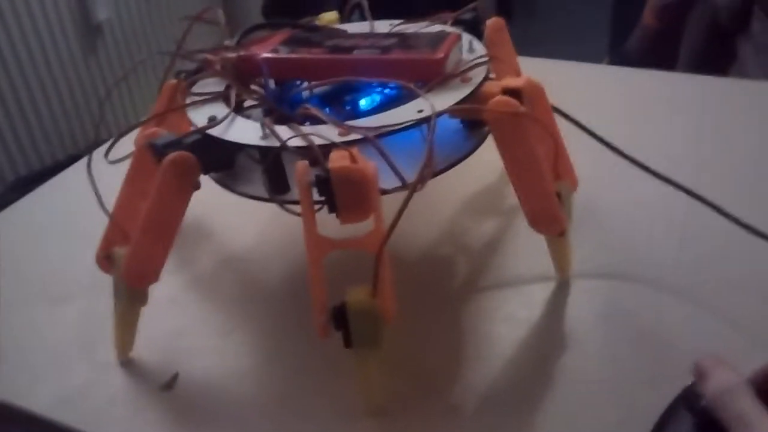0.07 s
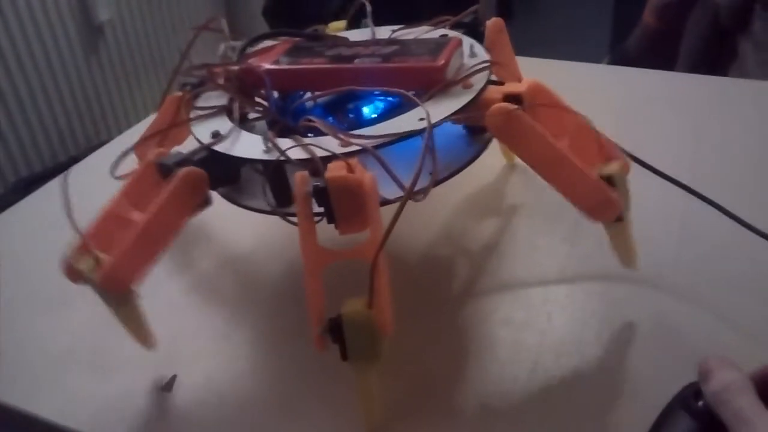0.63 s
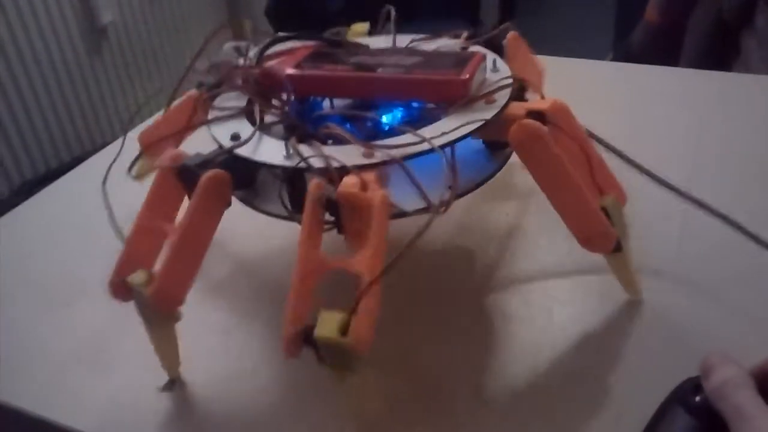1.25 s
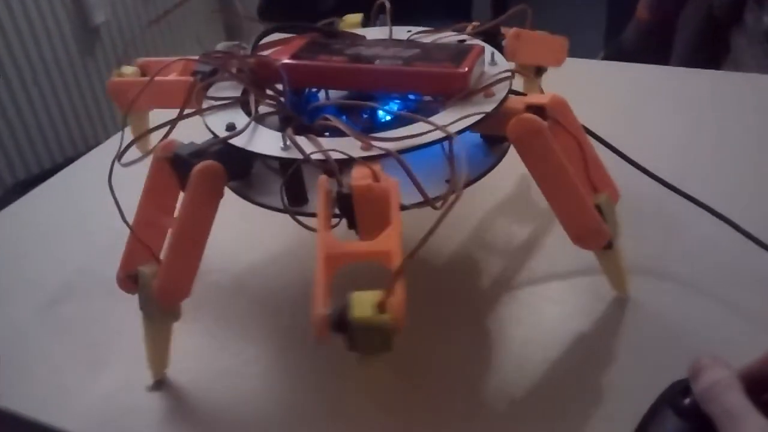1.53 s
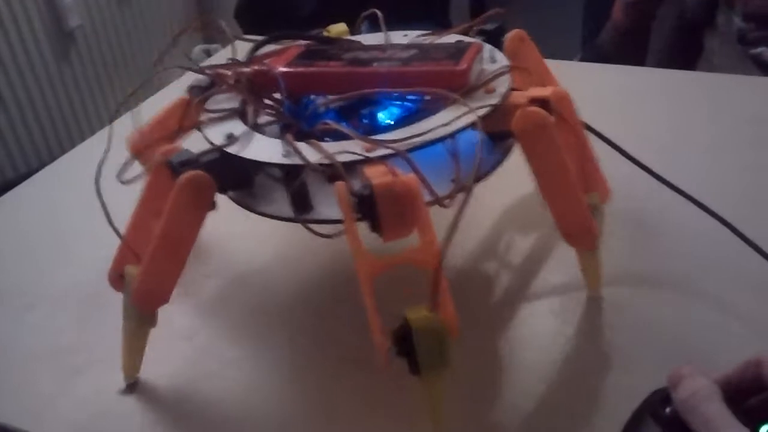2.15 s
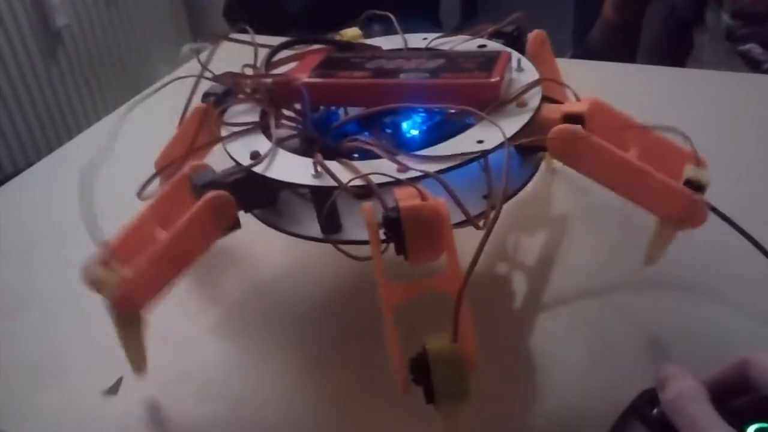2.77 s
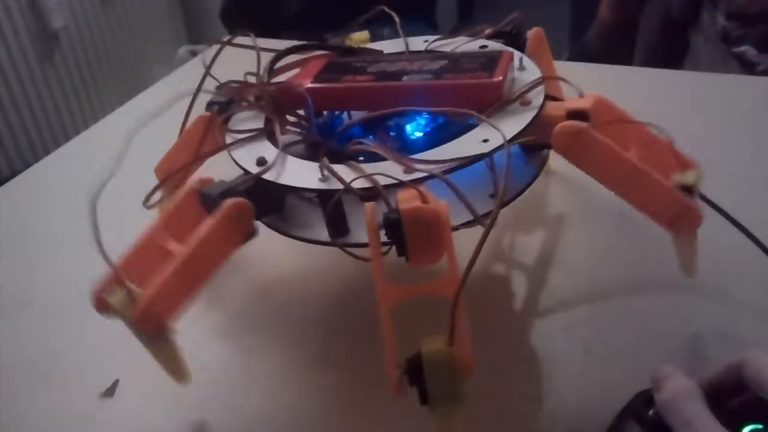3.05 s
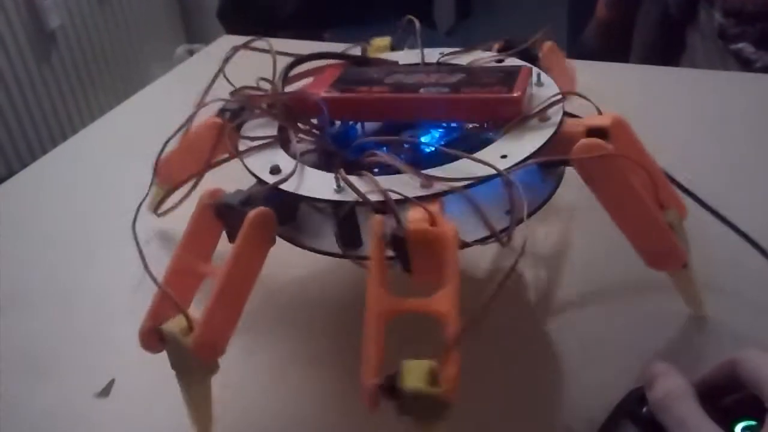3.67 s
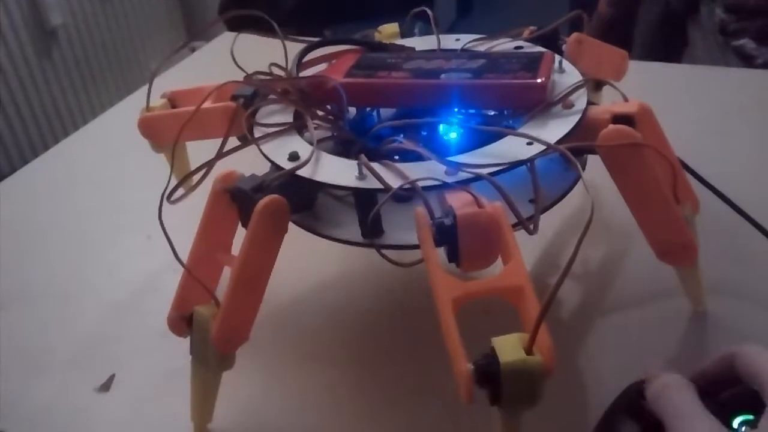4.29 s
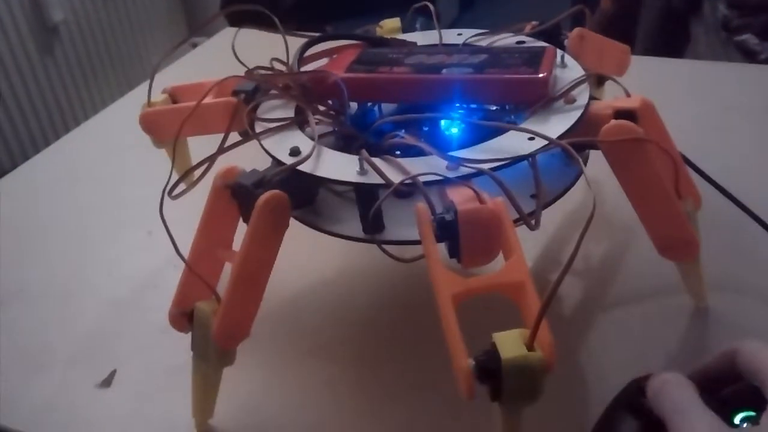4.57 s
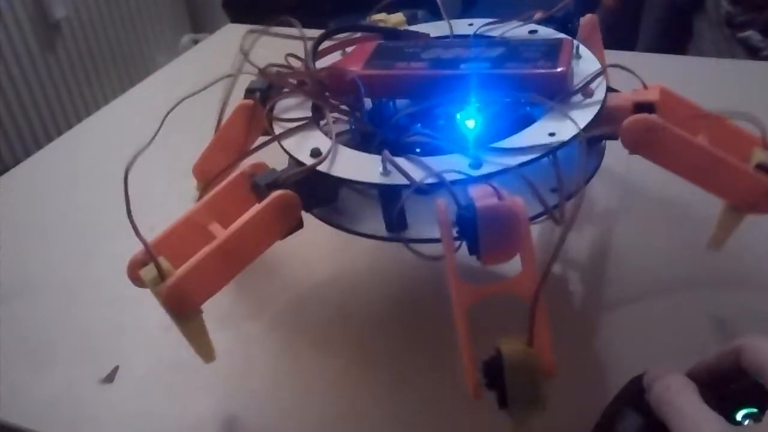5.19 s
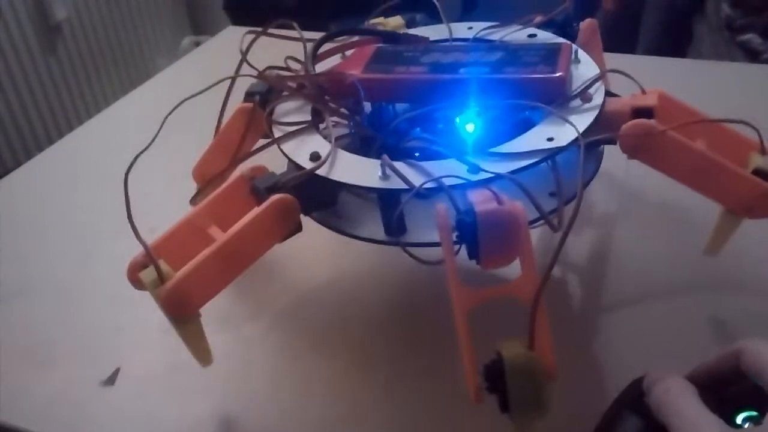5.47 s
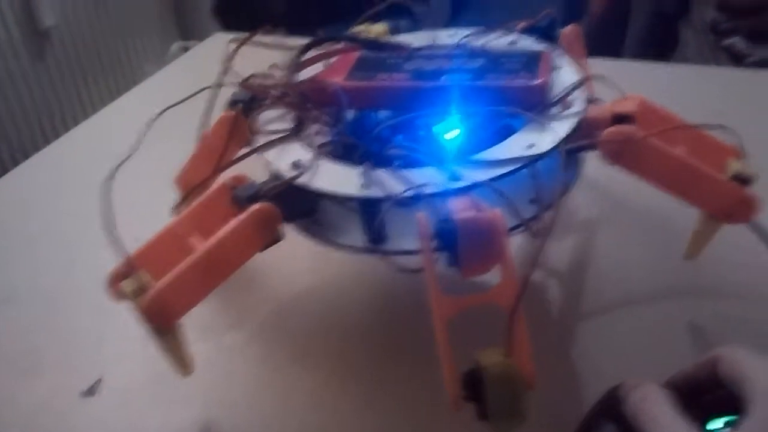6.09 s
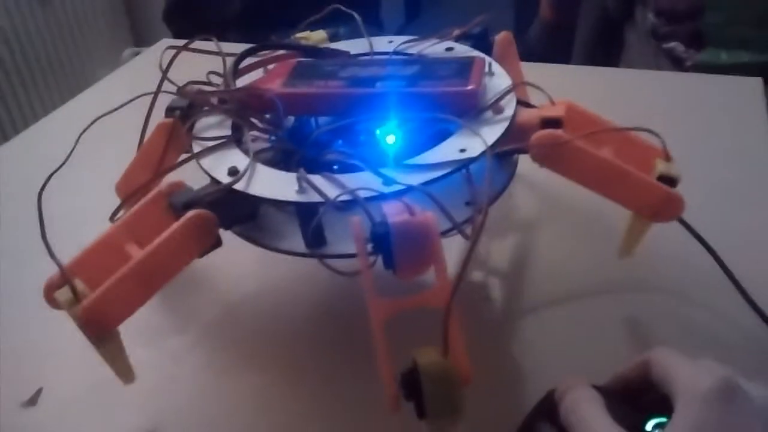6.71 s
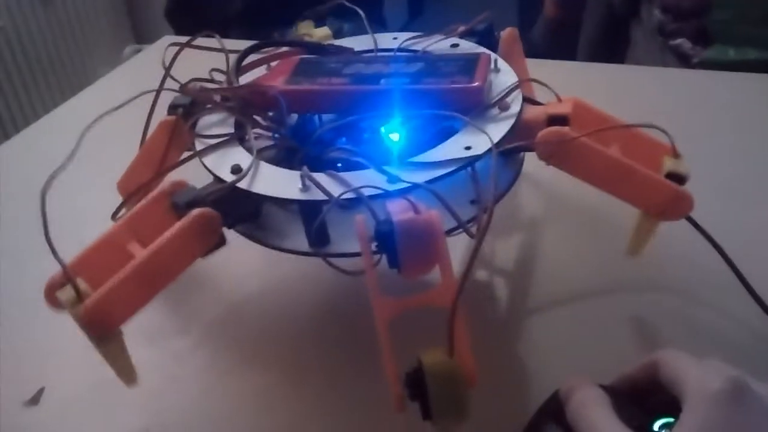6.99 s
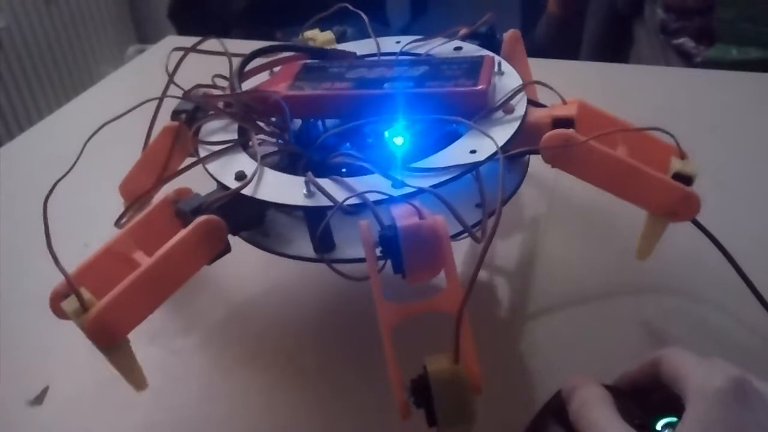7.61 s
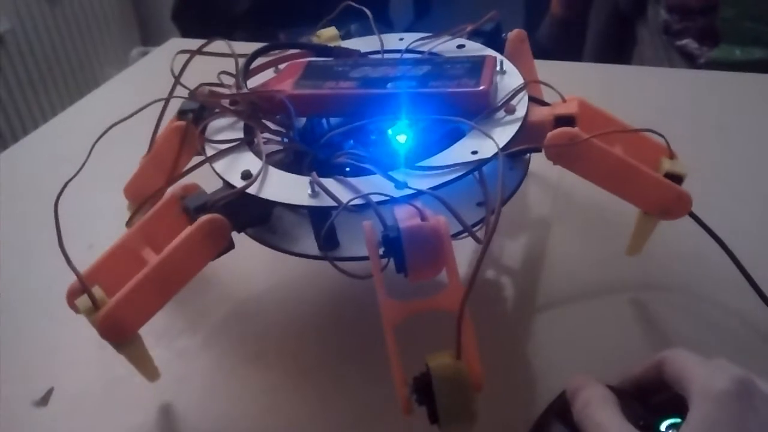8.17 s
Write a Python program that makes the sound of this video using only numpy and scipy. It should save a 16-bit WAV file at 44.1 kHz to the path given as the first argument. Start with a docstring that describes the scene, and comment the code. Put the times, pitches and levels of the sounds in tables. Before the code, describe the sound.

Close up in a small, quiet room, a plastic robot shifts its legs on a table. Short bursts of gear whirring come one after another over a faint electric buzz, mixed with dull taps and sharp plastic knocks. The movement pauses and the loaded servos tick quickly. Another whir brings the heaviest thump and a few softer steps. Then the servos keep up a rapid, rattling tick, interrupted once by a brief move.

```python
"""A six-legged plastic robot shifts its legs on a table in a small room, heard by two close, spaced mics.
For 4 s its geared servos whir in bursts and its feet land with soft thuds and hard knocks.
It then holds a pose: the servos, buzzing throughout at their 50 Hz control rate, tick under the load.
At 5 s it moves again and its heaviest drop rocks the table. Ticking fills most of the last 3 s,
with faint stall tones from 6.4 s and one short move and tap at 7 s."""
import sys
import numpy as np
from scipy import signal
from scipy.fft import rfft, irfft
from scipy.io import wavfile
from scipy.ndimage import uniform_filter1d

SR = 44100
rng = np.random.default_rng(int(sys.argv[2]) if len(sys.argv) > 2 else 0)


def inscribe(sig):
    """Save sig as 16-bit PCM at rate SR to the path in sys.argv[1].

    A 1-D sig is mono; a 2-D sig holds one channel per row.
    Samples are clipped to [-1, 1] before scaling.
    """
    pcm = np.round(np.clip(np.atleast_2d(sig).T, -1, 1) * 32767)
    wavfile.write(sys.argv[1], SR, pcm.astype(np.int16))


N = 367794
TIME = np.arange(N) / SR
CONTROL_HZ = 50

# gearbox spectrum: freq_hz, gain_db
GEARBOX_SPECTRUM = [(300, -52), (1200, -18.5), (2100, -8.5), (2750, -4), (3350, 3.5), (4200, 3.5),
                    (5000, 5.5), (5700, -0.5), (6500, 1.5), (7500, -1), (8500, -4), (10000, -10),
                    (15500, -25.5)]
# body drops onto its feet:
# start_s, tip_db, foot_cutoff_hz, weight_db, body_cutoff_hz, weight_lag_s, leg_hz, leg_db, bass_rolloff_hz
BODY_DROPS = [(1.161, -16.5, 1820, -25, 480, 0.0095, 303, 9, 50),
              (3.6292, -21.5, 2500, -22.5, 420, .0085, 272, 5, 55),
              (5.0273, -18.5, 2880, -10.5, 1700, .0085, 366, -10, 229)]


def moving_servos(gearbox_db=5.0, pinion_db=3.0, sizzle_db=-3.0, coast_db_per_s=250, size=26460):
    """Each move runs up, holds and coasts down; speed and loudness follow the effort."""
    # driven moves: start_s, length_s, run_up_s, whir_db, top_db, growl_db, whine_db,
    # full_speed_mesh_hz, rasp_hz, rasp_db, sizzle_hz
    moves = [(.122, .16, 0.075, -35.5, -6, -8, 2, 3598, 7280, -3.5, 9000),
             (0.51, 0.24, 0.041, -48.5, -4, -17, 3, 3577, 2350, -6, 13000),
             (1.046, 0.14, 0.06, -39.5, -6.5, -7, -15, 4174, 6900, -8, 10560),
             (1.199, 0.15, .038, -46, -9, -5, -11, 3566, 5000, 0, 9200),
             (1.307, .2, 0.069, -41, -7, -5, -2.5, 3447, 7100, -7, 8600),
             (1.559, 0.3, 0.05, -48, -8.5, -5.5, -21, 3590, 7860, -6, 7860),
             (1.993, 0.41, 0.034, -49.5, -10, -6, -2, 5200, 5140, 4.5, 7440),
             (2.304, 0.11, 0.047, -43.5, -4.5, -3.5, -1, 3500, 5180, -5, 12900),
             (2.409, .1, .04, -49, -7, -4.5, -10, 5307, 3820, -13, 13000),
             (2.626, 0.21, .064, -39.5, -10, -6, -4, 3187, 4860, -3, 15000),
             (2.829, 0.31, 0.031, -49.5, -4.5, -8, 0, 3785, 2350, -3, 12600),
             (3.172, 0.11, .046, -44, -5, -11, 1.5, 4210, 2510, 0, 11200),
             (3.518, .195, .1, -39.5, -7.5, -4, -13, 3890, 3330, -14, 11460),
             (3.706, .18, 0.053, -37.5, -9, -6, -4, 3450, 3050, -15, 10550),
             (3.89, 0.13, 0.042, -49.5, -8.5, -3, -13, 3994, 3320, -16, 9500),
             (4.944, .107, .048, -34, -8, -4, -13, 3494, 6400, -9, 13500),
             (5.075, 0.088, .03, -40, -9, -11, -3, 4500, 3170, -13, 9500),
             (6.967, 0.064, 0.015, -44, -9, -3, 0.5, 3694, 5000, -15, 7950)]
    # spectrum of a free-running motor's pinion: freq_hz, gain_db
    pinion_spectrum = [(3000, -51), (7000, -24), (9500, -1), (11500, 10.5), (12800, 9.5), (14500, 9),
                       (16000, -0.5)]
    # spectrum of legs shaken by a loaded motor: freq_hz, gain_db
    growl_spectrum = [(50, -75), (170, 15.5), (400, 2), (650, 10), (1000, 5), (1500, 9), (2200, 4.5),
                      (3200, -29.5)]
    out, t = np.zeros((2, N + size)), TIME[:size]
    for (start_s, length_s, run_up_s, whir_db, top_db, growl_db, whine_db,
         mesh_hz, rasp_hz, rasp_db, sizzle_hz) in moves:
        effort = np.minimum(t / run_up_s, 1) * from_db(-coast_db_per_s * np.maximum(t - length_s, 0))
        speed = effort ** .07
        gears = gear_train(mesh_hz * speed)
        case = from_db(gearbox_db) * unit_rms(colour(gears, GEARBOX_SPECTRUM))
        pinion = from_db(pinion_db) * unit_rms(colour(gears, pinion_spectrum))
        sizzle = from_db(sizzle_db) * rubbing_band(sizzle_hz * speed, width_hz=2300)
        growl = from_db(growl_db) * unit_rms(colour(gears, growl_spectrum))
        whine = from_db(whine_db) * mesh_whine(mesh_hz * speed)
        rasp = from_db(rasp_db) * rubbing_band(rasp_hz * speed, width_hz=650)
        whir = case + from_db(top_db) * (pinion + sizzle) + growl + whine + rasp
        flutter_db = 1.5 * drift(16.9, size)
        first = int(start_s * SR)
        out[:, first:first + size] += effort * from_db(whir_db + flutter_db) * whir
    return out[:, :N]


def gear_train(mesh_hz, step_down=3.1, teeth=19, rough_db=4.5, friction=0.86, shell_t60_s=0.029):
    """Three servos at unequal speeds: teeth click, harder once a rotor turn, over sliding friction."""
    out, size = 0, len(mesh_hz)
    for pace in np.linspace(.72, 1.25, 3):
        travel = np.cumsum(pace * mesh_hz * (1 + .05 * drift(22, size))) / SR
        press = 1 + 0.27 * np.sin(2 * np.pi * travel / teeth)
        backlash = .3 * drift(500, size)   # teeth meet early or late
        contacts = once_a_turn(travel / step_down + backlash)
        clicks = unit_rms(contacts * from_db(rough_db * rng.standard_normal(size)))
        share = from_db(2.5 * drift(9.9, size) + 2.6 * drift(72.4, size))   # joints take turns leading
        force = share * press * (clicks + friction * rng.standard_normal(size))
        out = out + convolve(force, dying_noise(shell_t60_s, size=512))
    running_power = uniform_filter1d(np.mean(out ** 2, axis=0), size=2205)
    return out / np.sqrt(running_power + 1e-12)


def mesh_whine(mesh_hz, teeth=19, rasp=0.4, blur_rad=0.94, blur_hz=350, octave_db=-20.0):
    """The first gear stages sing at the mesh pitch and its octave, rasping once a rotor turn."""
    out, size = 0, len(mesh_hz)
    for pace in (.92, 1, 1.07):
        angle = 2 * np.pi * np.cumsum(pace * mesh_hz * (1 + .03 * drift(25, size))) / SR
        shaken = angle + blur_rad * np.array([drift(blur_hz, size), drift(blur_hz, size)])
        press = from_db(2.4 * drift(59, size)) * (1 + rasp * np.sin(angle / teeth))
        out = out + press * (np.sin(shaken) + from_db(octave_db) * np.sin(2 * shaken))
    return unit_rms(out)


def rubbing_band(hz, width_hz, wander=.04):
    """A rubbing gear: a noise band whose pitch follows the motor and wanders."""
    size = len(hz)
    angle = 2 * np.pi * np.cumsum(hz * (1 + wander * drift(25, size))) / SR
    pair = [drift(width_hz, size) * np.sin(angle) + drift(width_hz, size) * np.cos(angle)
            for _ in range(2)]
    return unit_rms(np.array(pair))


def knocks(crack_db=32.0, snap_db=16.5, side_db=-3.5, leg_t60_s=0.098, size=16384):
    """Each landing rings leg and table, clatters the plastic and snaps the gear slack shut."""
    # modes of table top and robot frame: freq_hz, level_db, t60_s
    modes = [(73.3, -14, 0.35), (102, -21, 0.28), (140.6, -13, .22), (189, -6, 0.19), (232.5, -9.5, 0.13),
             (266, -9, 0.14), (294, -12.5, 0.11), (374, -4.5, 0.09), (426.3, -8.5, 0.11), (450, -7.5, 0.13),
             (503, -10, 0.085), (560, -7, 0.066), (592, -10, 0.12), (672, -11.5, 0.095), (737, -5.5, 0.061),
             (847, -8, 0.04), (996, -11.5, 0.083), (1102, -7, 0.058), (1167, -10.5, 0.093),
             (1384, -14, 0.076), (1458, -11, 0.05), (1710, -11, 0.054), (1880, -24, .08),
             (3670, -28, 0.056), (3930, 9, 0.031)]
    # spectrum of clattering plastic: freq_hz, gain_db
    crack_spectrum = [(60, -27), (130, 2.5), (300, -4), (600, -6), (1200, -.5), (1900, 2.5), (2500, 1),
                      (3800, -5), (5000, -12), (8000, -28), (15500, -27)]
    out, t = np.zeros((2, N + size)), TIME[:size]
    hz, mode_db, t60_s = np.transpose(modes)
    rings = np.sin(2 * np.pi * hz[:, None] * t) * from_db(-60 * t / t60_s[:, None])
    for start_s, strength_db, cutoff_hz, leg_hz, leg_db, bass_hz in foot_contacts():
        signs = rng.choice([-1, 1], (2, len(hz)))   # each spot pushes the modes its own way
        bass_rolloff = hz ** 2 / (hz ** 2 + bass_hz ** 2)
        shares = signs * from_db(mode_db + 2.5 * rng.standard_normal(len(hz))) * bass_rolloff
        softness = signal.butter(3, cutoff_hz, fs=SR, output="sos")
        thud = signal.sosfilt(softness, shares @ rings) * from_db([[0], [side_db]])
        swell = np.minimum(t * cutoff_hz / 2, 1)   # softer contact, slower rise
        leg = swell * from_db(leg_db - 60 * t / leg_t60_s) * np.sin(2 * np.pi * leg_hz * t)
        thud[0] += leg
        crack = from_db(crack_db) * colour(dying_noise(t60_s=0.053, size=size), crack_spectrum)
        snap = from_db(snap_db) * colour(dying_noise(t60_s=0.048, size=size), GEARBOX_SPECTRUM)
        hardness = from_db(8.5 * np.log2(cutoff_hz / 2350))   # 8.5 dB per octave
        first = int(start_s * SR)
        out[:, first:first + size] += from_db(strength_db) * (thud + hardness * (crack + snap))
    return out[:, :N]


def foot_contacts(tap_leg_db=2.0, tap_bass_hz=70, tip_leg_db=-10, rebound_s=0.0155, rebound_db=-7.5):
    """A tap is one contact; a drop is three: tip, body weight, rebound of the tip."""
    # foot taps: start_s, strength_db, cutoff_hz, leg_hz
    taps = [(0.184, -40.5, 1540, 550), (1.0845, -19, 565, 430), (2.229, -35.5, 515, 396),
            (2.345, -36.5, 1000, 179), (2.391, -30, 1710, 550), (2.425, -27, 150, 142.4),
            (2.446, -25, 149, 143), (3.545, -29, 510, 419), (5.011, -18.5, 202, 190),
            (5.149, -35, 250.7, 183), (5.186, -27.5, 356, 245.6), (5.205, -32.5, 357, 420),
            (7.06, -43, 198.7, 174)]
    contacts = [(*tap, tap_leg_db, tap_bass_hz) for tap in taps]
    for start_s, tip_db, foot_hz, weight_db, body_hz, lag_s, leg_hz, leg_db, bass_hz in BODY_DROPS:
        contacts += [(start_s, tip_db, foot_hz, leg_hz, tip_leg_db, bass_hz),
                     (start_s + lag_s, weight_db, body_hz, leg_hz, leg_db, bass_hz),
                     (start_s + rebound_s, tip_db + rebound_db, foot_hz, leg_hz, tip_leg_db, bass_hz)]
    return contacts


def ticking_servos(uneven_db=0.9, jitter_frames=.012, tick_db=-2.5, tail_db=-1.5, rattle=0.99):
    """The most loaded servos tick every control frame, early or late as the slack is taken up."""
    # spells under load: start_s, end_s, slot_frames, level_db
    spells = [(4.053, 4.92, .53, -26), (5.299, 6.962, 0.61, -21.5), (5.55, 6.962, 0.64, -21),
              (5.603, 6.964, .88, -21), (7.2, 8.396, 0.68, -22.5)]
    # tick spectrum: freq_hz, gain_db
    tick_spectrum = [(300, -34), (750, -5.5), (1200, -18.5), (2600, -11), (3200, -16), (3650, 2.5),
                     (4400, -4), (5300, -7), (5800, -12), (6250, -5), (6900, -15), (8000, -15),
                     (10000, -39), (15500, -32)]
    kicks = np.zeros(N)
    for start_s, end_s, slot_frames, level_db in spells:
        frames = CONTROL_HZ * TIME - slot_frames + jitter_frames * drift(50)
        kicks += once_a_turn(frames) * (TIME > start_s) * (TIME < end_s) * from_db(level_db)
    kicks *= from_db(uneven_db * drift(40))
    tick = from_db(tick_db) * slack_ticks(kicks, rattle, t60_s=0.008)
    tail = from_db(tail_db) * slack_ticks(kicks, rattle, t60_s=0.031)
    return colour(tick + tail, tick_spectrum)


def holding_servos(uneven_db=4.0, settle_s=0.099):
    """Each servo gets one corrective kick per control frame; the kicks blur into a buzz over motor hum."""
    # held poses: start_s, buzz_db, hum_db
    poses = [(0, -52.5, -57), (0.3, -45.5, -54.5), (1.9, -44.5, -53.5), (3.1, -47, -57), (4.1, -55.5, -67),
             (5.6, -50.5, -61), (7.0, -48, -57), (7.7, -48.5, -59.5)]
    # buzz spectrum: freq_hz, gain_db
    buzz_spectrum = [(100, -14.5), (400, -16), (680, -3), (900, -8), (1150, -10.5), (1600, -8), (2600, -5),
                     (3300, 1.5), (3700, 0.5), (4400, 1), (5300, 1.5), (5800, -6.5), (6300, -4.5),
                     (7500, -7.5), (9500, -12), (15500, -21.5)]
    # motor hum partials: pitch_hz, level_db
    partials = [(100, -12), (150, -3.5), (200, 0.5), (250, -11.5), (400, -10)]
    starts_s, *levels_db = np.transpose(poses)
    pose = np.searchsorted(starts_s[1:], TIME)
    buzz_db, hum_db = [uniform_filter1d(db[pose], int(settle_s * SR)) for db in levels_db]
    ticks = hum = 0
    for slot_frames in (.13, .42, .66, .86):
        kicks = once_a_turn(CONTROL_HZ * TIME - slot_frames) * from_db(uneven_db * drift(40))
        ticks += slack_ticks(kicks, rattle=1.0, t60_s=0.067)
    for pitch_hz, level_db in partials:
        gain = from_db(level_db + 3.9 * drift(21))
        hum += gain * np.sin(2 * np.pi * pitch_hz * TIME + np.array([drift(25), drift(28)]))
    return from_db(buzz_db) * unit_rms(colour(ticks, buzz_spectrum)) + from_db(hum_db) * unit_rms(hum)


def slack_ticks(kicks, rattle, t60_s):
    """Each kick rings the servo's case and rattles the slack in its gears."""
    energy = convolve(kicks ** 2, dying_noise(t60_s, size=2048)[0] ** 2)
    chatter = np.sqrt(np.abs(energy)) * rng.standard_normal((2, N))
    return convolve(kicks, dying_noise(t60_s, size=2048)) + rattle * chatter


def straining_servos(fade_s=0.075, waver_hz=1.97, size=52920):
    """A stalled servo holds a faint, nearly steady tone."""
    # stalls: start_s, end_s, pitch_hz, level_db
    stalls = [(4.049, 4.98, 152, -57), (6.407, 7.003, 650, -62.5), (6.45, 6.953, 955, -66)]
    out, t = np.zeros((2, N + size)), TIME[:size]
    for start_s, end_s, pitch_hz, level_db in stalls:
        gate = np.clip(np.minimum(t, end_s - start_s - t) / fade_s, 0, 1)
        waver_rad = 2 * np.array([drift(waver_hz, size), drift(waver_hz, size)])
        tone = unit_rms(np.sin(2 * np.pi * pitch_hz * t + waver_rad))
        first = int(start_s * SR)
        out[:, first:first + size] += from_db(level_db) * gate * tone
    return out[:, :N]


def table_sway(sway_hz=13.7, level_db=-40, attack_s=.04, t60_s=1.8):
    """The heaviest drop rocks the table on its legs."""
    start_s = max(BODY_DROPS, key=lambda drop: drop[3])[0]
    t = np.maximum(TIME - start_s, 0)
    envelope = np.minimum(t / attack_s, 1) * from_db(level_db - 60 * t / t60_s)
    return envelope * np.sin(2 * np.pi * sway_hz * t)


def room_tone(level_db=-52.0):
    """Quiet, steady noise, strongest in the bass."""
    # background spectrum: freq_hz, gain_db
    spectrum = [(15, 8.5), (35, 3), (60, -3.5), (300, -6), (600, -9), (1200, -18), (2500, -11), (6000, -16),
                (10000, -27), (15500, -22.5)]
    return from_db(level_db) * unit_rms(colour(rng.standard_normal((2, N)), spectrum))


def room(x, t60_s=0.28, wet_db=-9.5, first_echo_s=0.0068):
    """The walls add a short diffuse tail."""
    tail = dying_noise(t60_s) * (TIME[:SR // 2] > first_echo_s)
    return x + from_db(wet_db) * convolve(x, tail)


def mic_ports(mid_side):
    """Spaced ports hear the sound in step at some pitches and opposed at others."""
    # left-right likeness: freq_hz, likeness
    likeness = [(40, -0.56), (150, 0.44), (600, 0.31), (1250, 1.5), (1700, 0.5), (2200, -.5), (2600, -1.09),
                (3000, -0.5), (3650, 0.9), (4750, -0.82), (5800, 0.4), (6800, 0), (7700, -.5), (8900, 0.3),
                (10200, 0)]
    # port balance: freq_hz, left_minus_right_db
    balance = [(100, -0.5), (600, 0.5), (1200, 1.5), (2000, -3.5), (2600, 0), (3400, -3), (5000, 0.5),
               (6300, 3.5), (10000, 0), (14500, 1)]
    mid = colour(mid_side[0], likeness, lambda c: np.sqrt((1 + np.clip(c, -.99, .99)) / 2))
    side = colour(mid_side[1], likeness, lambda c: np.sqrt((1 - np.clip(c, -.99, .99)) / 2))
    left = colour(mid + side, balance, lambda db: from_db(db / 2))
    right = colour(mid - side, balance, lambda db: from_db(-db / 2))
    return np.vstack([left, right])


def from_db(db):
    """Decibels to gain."""
    return 10 ** (np.asarray(db) / 20)


def unit_rms(x):
    """Scale to unit power."""
    return x / np.sqrt(np.mean(x ** 2) + 1e-20)


def drift(rate_hz, size=N):
    """Random wander, spread about 1."""
    knots = rng.standard_normal(int(rate_hz * size / SR) + 2)
    return np.interp(TIME[:size] * rate_hz, np.arange(len(knots)), knots)


def convolve(x, response):
    """Apply an impulse response, keeping the length of x."""
    return signal.oaconvolve(np.atleast_2d(x), np.atleast_2d(response), axes=-1)[:, :np.shape(x)[-1]]


def colour(x, points, to_gain=from_db, size=4096):
    """Minimum-phase filter through the points of a spectrum."""
    hz, value = np.transpose(points)
    grid_hz = np.maximum(np.fft.rfftfreq(size, 1 / SR), 1)
    gain = to_gain(np.interp(np.log(grid_hz), np.log(hz), value))
    cepstrum = irfft(np.log(gain))
    cepstrum[1:size // 2] *= 2
    cepstrum[size // 2 + 1:] = 0
    return convolve(x, irfft(np.exp(rfft(cepstrum))))


def dying_noise(t60_s, size=22050):
    """Two independent decaying noise bursts of unit energy."""
    burst = rng.standard_normal((2, size)) * from_db(-60 * TIME[:size] / t60_s)
    return burst / np.sqrt(np.sum(burst ** 2, axis=1, keepdims=True))


def once_a_turn(turns):
    """A unit click whenever the count passes a whole number."""
    return np.diff(np.floor(turns), prepend=np.floor(turns[0]))


def scene():
    """The robot in its room, over a quiet background."""
    robot = moving_servos() + holding_servos() + ticking_servos() + straining_servos() + knocks()
    background = room_tone()
    return mic_ports(room(robot) + background) + table_sway()


def record(dry):
    """Steep low-pass."""
    cutoff_hz = 15600
    return signal.sosfilt(signal.ellip(12, .1, 90, cutoff_hz, fs=SR, output="sos"), dry)


dry = scene()
out = record(dry)
inscribe(out)
```